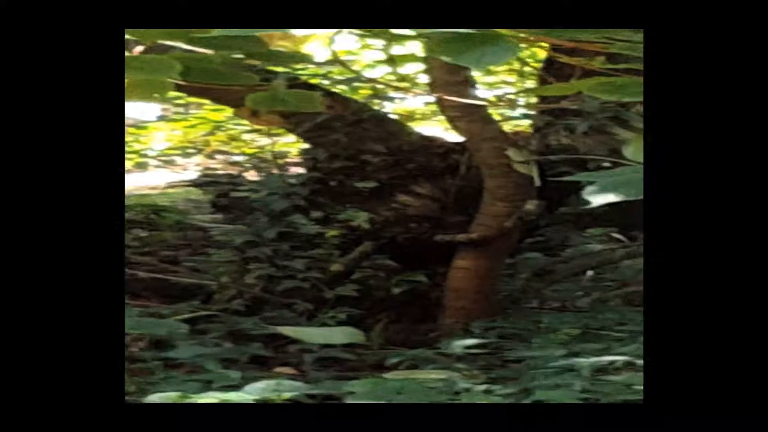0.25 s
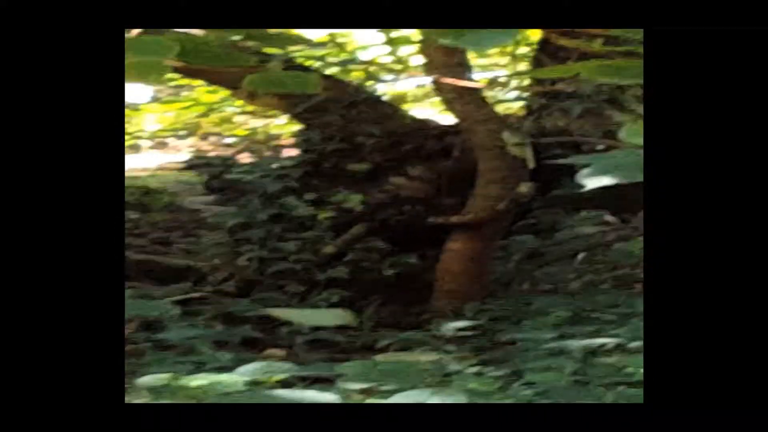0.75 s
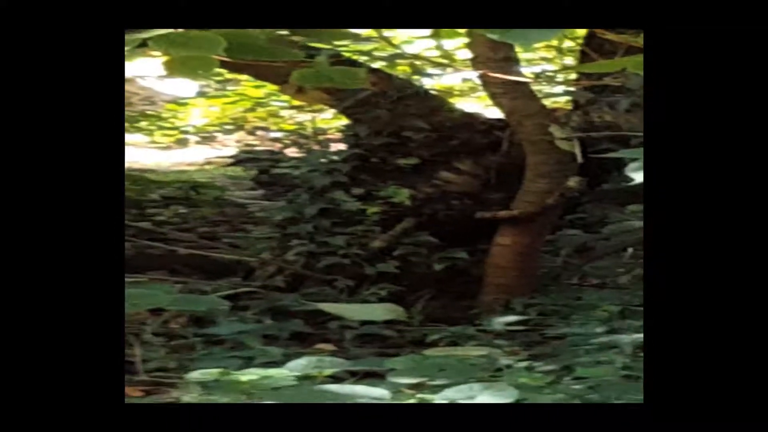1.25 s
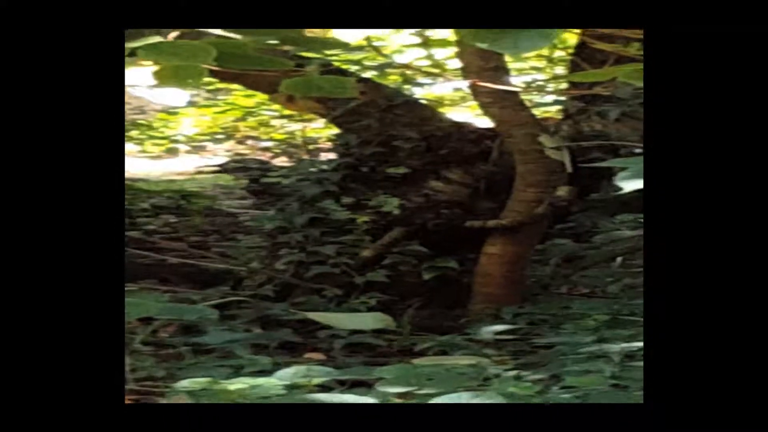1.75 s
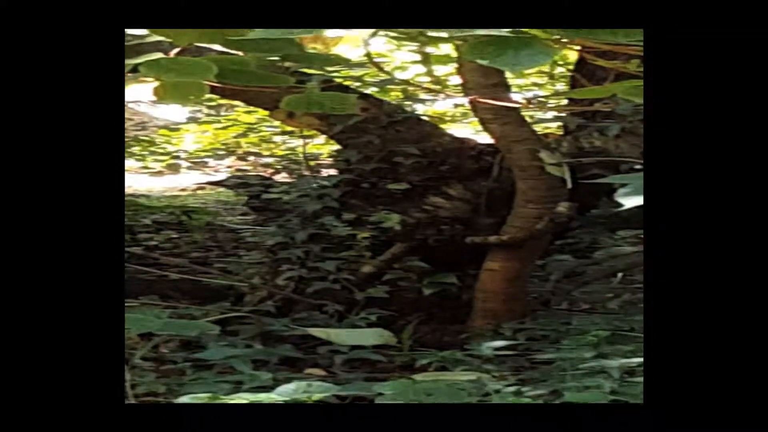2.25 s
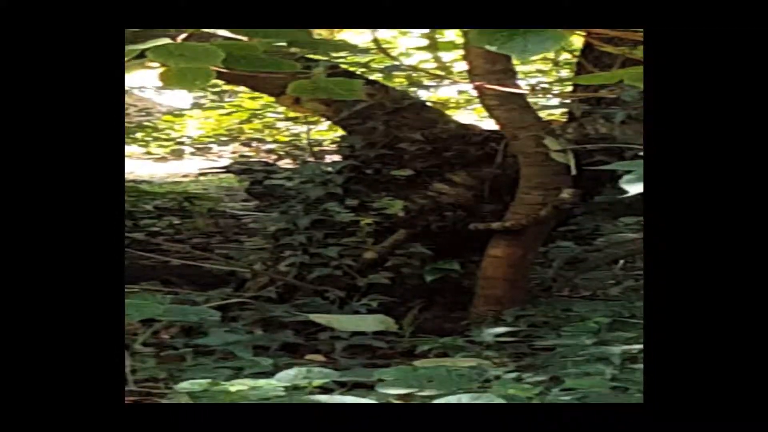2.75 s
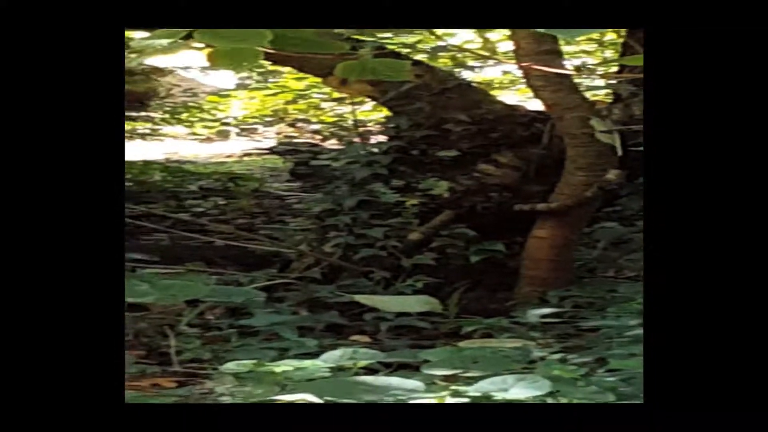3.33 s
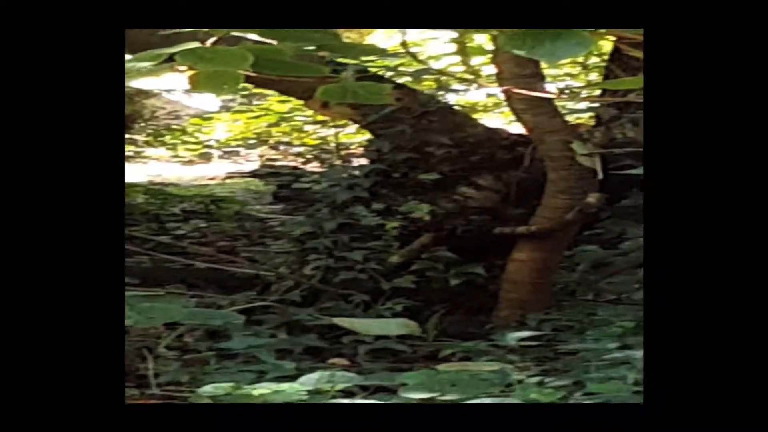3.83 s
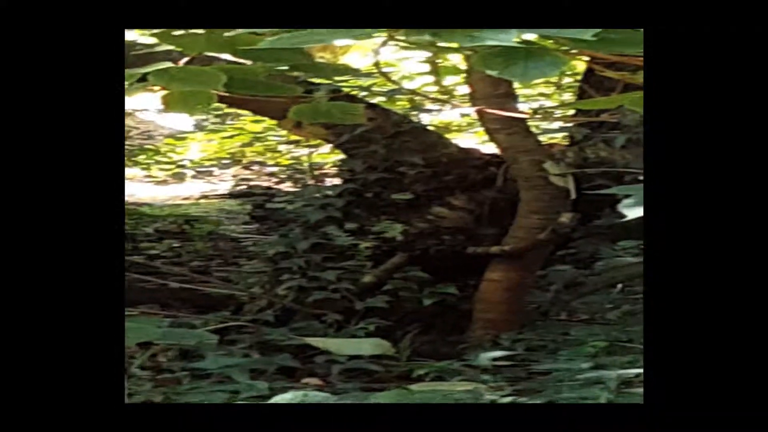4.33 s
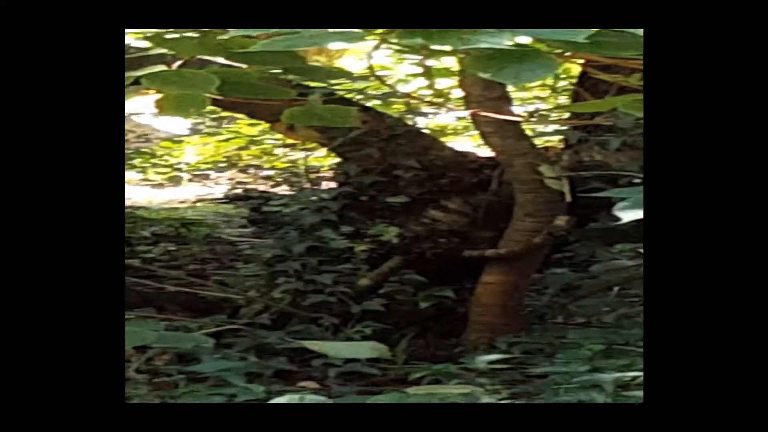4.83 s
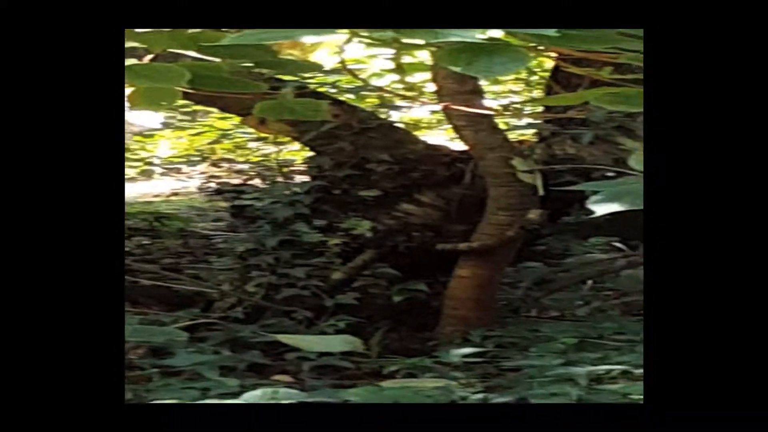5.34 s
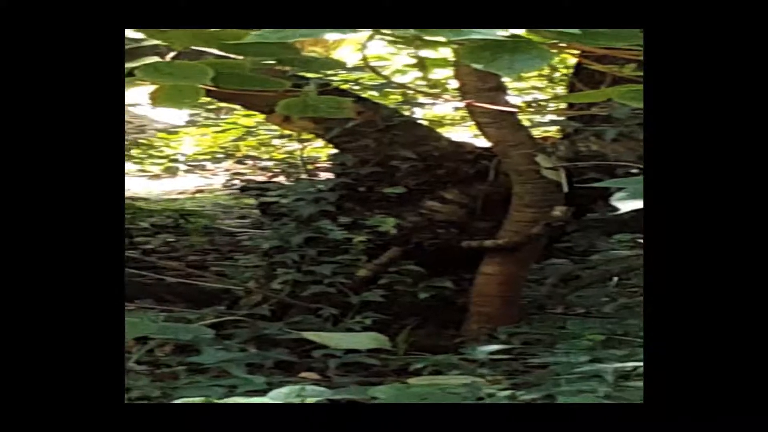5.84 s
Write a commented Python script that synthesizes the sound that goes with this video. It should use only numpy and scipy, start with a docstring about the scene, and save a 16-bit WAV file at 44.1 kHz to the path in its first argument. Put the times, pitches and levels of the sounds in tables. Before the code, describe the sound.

In a leafy forest, a large songbird sings some metres from a small stereo microphone, its notes blurred by echoes from trunks and leaves. Two short whistled slurs come at 0.2 and 0.35 s, then a thin wavering whistle near 2 kHz from 0.45 to 1.45, strengthening at the end. A loud whip shoots upward at 1.5-1.7 with a hoarse edge; a high chip at 2.0 leads straight into a stepped falling whip until 2.2. Echo and quiet follow. Faint rasps and chips start around 2.8, with stronger hoarse pairs at 3.25 and 3.4, weak rasps to 4.1, sharp chips at 4.2-4.35, and softer ones at 4.7 and 5.1. From 5.27, four clattering gallops repeat every 0.22 s: clicks, rasp, dipping low scoop and buzzy high voice. Throughout, a faint very high cricket rasps in threes about four times a second above leaf murmur and far traffic, whose rumble is strongest at the start.

```python
"""Leafy forest, a large songbird some metres from the two microphone ports of a camera.
It opens with two slurs and a long wavering whistle, then a rising whip, a chip and a stepped falling whip;
hoarse rasps and quick chips follow, then a galloping phrase sung with both sides of its voice box.
Whistles are unsteady sines, rasps are slaps and breath in resonant cavities, gallops open with clicks.
Throughout, the trees answer the song, a bush cricket rasps in threes, far traffic and leaves murmur."""
import sys
import numpy as np
from scipy import signal
from scipy.fft import rfft, irfft, next_fast_len
from scipy.io import wavfile
from scipy.ndimage import uniform_filter1d, map_coordinates

SR = 44100
rng = np.random.default_rng(int(sys.argv[2]) if len(sys.argv) > 2 else 0)


def wav_record(signal):
    """Record a signal, one row per channel, as 16-bit PCM in the file named by sys.argv[1]."""
    frames = np.transpose(np.atleast_2d(signal))
    bounded = np.clip(frames, -1, 1)
    # unit amplitude maps onto the largest positive 16-bit level
    quanta = np.round(bounded * 32767).astype(np.int16)
    wavfile.write(sys.argv[1], SR, quanta)


N = 267466
TOP_HZ = 15800  # upper limit of the microphone's band


def amp(db):
    """Gain of a level in dB."""
    return 10 ** (np.asarray(db) / 20)


def unit(x):
    """x at rms 1."""
    return x / np.sqrt(np.mean(x ** 2) + 1e-20)


def along(points, hz):
    """Reads (f/Hz, value) points on a log frequency axis."""
    f, value = np.transpose(points)
    return np.interp(np.log(hz + 1), np.log(f + 1), value)


def span(rows, start=0):
    """Sample numbers covered by the rows, a soft edge, and each column read at those samples."""
    t, *columns = np.transpose(sorted(rows))
    first, last = start + t[0], start + t[-1]
    at = np.arange(round(first * SR), min(N, round(last * SR)))
    edge = np.clip(np.minimum(at / SR - first, last - at / SR) / 0.0014, 0, 1)
    return at, edge, [np.interp(at / SR - start, t, c) for c in columns]


def wobble(rate, size=N):
    """A smooth random curve, rate knots a second."""
    knots = rng.standard_normal(int(size * rate / SR) + 4)
    return map_coordinates(knots, [np.arange(size) * rate / SR])


def filtered(x, response):
    """x times a complex response of frequency."""
    m = next_fast_len(N + SR // 2)
    return irfft(rfft(x, m) * response(np.fft.rfftfreq(m, 1 / SR)), m)[..., :N]


def resonance(f, centre, width):
    """Response of one damped cavity, 1 at its centre."""
    return 1j * f * width / (centre * centre - f * f + 1j * f * width)


def resonant(x, modes):
    """x passed twice through side-by-side resonances of alternating sign, at rms 1."""
    def tube(f):
        return sum((-1) ** k * amp(db) * resonance(f, c, w) for k, (c, w, db) in enumerate(modes))
    return unit(filtered(x, lambda f: tube(f) ** 2))


# overtones of the voice, before each note's strength: multiple of the pitch, level/dB re fundamental
OVERTONE_LEVELS = [(2, -20.5), (3, -31), (4, -41), (5, -29), (6, -28.5)]
THROAT_HZ, THROAT_WIDTH_HZ, THROAT_DB = 1416, 83, 7.5  # clear notes swell as they cross this resonance
BRIGHTENS, WHIP_BRIGHTENS = 0.26, 0.43  # dB of overtones per dB of loudness within a note


def sing_note(out, rows, brassy_db, rough, flutter, start=0, gain_db=0, spread=0, brightens=BRIGHTENS):
    """Sings a clear note: a membrane swings almost as a sine, unsteady in size and timing, overtones weak."""
    at, edge, (hz, db) = span(rows, start)
    brassy_db = brassy_db + brightens * (db - db.max())

    def throat(f):
        return amp(THROAT_DB / (1 + ((f - THROAT_HZ) / THROAT_WIDTH_HZ) ** 2))

    # the size of shake wavers the loudness, its angle the timing
    shake = 1 + rough * (wobble(flutter, len(at)) + 1j * wobble(flutter, len(at)))
    shake = shake / np.sqrt(1 + 2 * rough ** 2)
    detuned_hz = hz * (1 + spread * rng.standard_normal())
    phase = 2 * np.pi * np.cumsum(detuned_hz) / SR + np.angle(shake)
    tone = throat(hz) * np.sin(phase)
    for k, level in OVERTONE_LEVELS:
        in_band = k * hz < TOP_HZ
        tone = tone + amp(level + brassy_db) * throat(k * hz) * np.sin(k * phase) * in_band
    out[at] += np.sqrt(2) * edge * amp(db + gain_db) * np.abs(shake) * tone


# the rising whip, before throat swell: t/s, f/Hz, level/dB
RISING_WHIP = [(1.52, 800, -55.5), (1.54, 692.7, -42.5), (1.59, 783, -44), (1.611, 922.4, -31),
               (1.649, 1419, -29), (1.665, 1973, -31), (1.697, 6100, -22.5)]


def rising_whip():
    """Rows of a whistle whose period changes evenly between points, so a climb in pitch speeds up."""
    t_points, hz, db = np.transpose(RISING_WHIP)
    t = np.linspace(t_points[0], t_points[-1], num=80)
    period = np.interp(t, t_points, 1 / hz)
    return list(zip(t, 1 / period, np.interp(t, t_points, db)))


ONSET_DB, FADE_DB = -18, -9.5  # start and end of a short note, under its turn
SCOOP_FROM_S, SCOOP_LOW_S, SCOOP_LOW_HZ = .024, .098, 786  # s after the scoop's time origin
FLICK_S, FLICK_BACK_S, FLICK_BACK_HZ = .143, .16, 1210
DIP_BEND, CLIMB_BEND = 170, 440  # log pitch over the low point per s squared, before and after it
FLICK_DB = -5  # the flick is softer than the dip


def scoop(top_hz):
    """Rows of the low voice of a gallop: a slow dip, a quicker climb, a flick back down."""
    t = np.linspace(SCOOP_FROM_S, FLICK_S, num=40)
    dipping = t < SCOOP_LOW_S
    bend = np.where(dipping, DIP_BEND, CLIMB_BEND)
    hz = SCOOP_LOW_HZ * np.exp(bend * (t - SCOOP_LOW_S) ** 2)
    db = ONSET_DB * np.clip(1 - (t - SCOOP_FROM_S) / 0.018, 0, 1)
    db = db + FLICK_DB * (t > SCOOP_LOW_S) * (hz > THROAT_HZ)
    capped_hz = np.where(dipping, hz, np.minimum(hz, top_hz))
    return [*zip(t, capped_hz, db), (FLICK_BACK_S, FLICK_BACK_HZ, FLICK_DB)]


# smooth opening notes: t/s, turn after t/s, length/s, start f/Hz, turn f/Hz, end f/Hz,
# level at the turn/dB, overtone strength/dB
OPENING_SLURS = [(.188, 0.0163, .036, 2150, 1727, 1760, -44.5, -7),
                 (.342, .026, 0.05, 2114, 1830, 2230, -40.5, -3)]
# short fluttering notes, same columns
CHIP_NOTES = [(1.998, 0.017, 0.029, 7820, 7680, 6830, -47.5, -8.5),
              (3.03, .022, .036, 3350, 3050, 4350, -59, -18),
              (3.068, .012, .026, 4400, 4550, 4500, -68, -18),
              (4.126, .006, .02, 1200, 1460, 1900, -59, -10),
              (3.245, 0.0254, 0.033, 860, 1350, 1440, -49, 2),
              (3.36, 0.0123, 0.022, 1373, 1384, 1920, -49, -10),
              (3.382, 0.0062, 0.04, 968, 921, 910, -50.5, -7.5),
              (4.225, .005, .014, 1034, 2080, 5270, -36.5, 3.5),
              (4.241, 0.00287, .029, 2800, 2105, 1278, -45, 5),
              (4.331, 0.0045, 0.0098, 1080, 1950, 2590, -32.5, 4.5),
              (4.339, 0.0044, 0.017, 2377, 2585, 2537, -33, -5),
              (4.708, 0.00398, .012, 1290, 1980, 4410, -42.5, -14),
              (4.722, 0.0079, .022, 2310, 1397, 874, -49.5, -15),
              (5.116, 0.0075, 0.0152, 5950, 5940, 7200, -46.5, -3)]
# the long wavering whistle, before throat swell: t/s, f/Hz, level/dB
LONG_WHISTLE = [(.44, 2086, -67), (.53, 2067, -50), (.575, 2061, -61), (0.604, 1880, -50),
                (0.638, 1974, -55), (.8, 2020, -54), (.922, 1996, -59), (.938, 1969, -46),
                (1.02, 2011, -55.5), (1.14, 1979, -51), (1.198, 1990, -62.5), (1.213, 1944, -50),
                (1.265, 2061, -47), (1.323, 2050, -50.5), (1.341, 2046, -36.5), (1.391, 1957, -32.5),
                (1.402, 2092, -40), (1.428, 1983, -41), (1.445, 2010, -56)]
# the stepped falling whip, before throat swell: t/s, f/Hz, level/dB
FALLING_WHIP = [(2.022, 5280, -59.5), (2.025, 5980, -31.5), (2.038, 6030, -28.5), (2.052, 5600, -28.5),
                (2.06, 4590, -28.5), (2.093, 4577, -23.5), (2.11, 3220, -29), (2.14, 2686, -35),
                (2.151, 2606, -26.5), (2.17, 1424, -40.5), (2.19, 735, -59)]
# gallops: t/s, then gains on each part's own levels: click level/dB, scoop level/dB, upper voice level/dB,
# rasp level/dB; top of the flick f/Hz, lateness of the scoop t/s
GALLOPS = [(5.272, -34, -52, -3, -5.5, 2090, .002), (5.491, -28, -51, 2.5, -1.3, 2160, -.001),
           (5.712, -30.5, -49, 0.5, -1.1, 1410, -.002), (5.933, -32, -49, 1, 1.5, 2100, -0.0049)]
# high voice of a gallop: t/s after its start, f/Hz, level/dB before the gallop's gain
UPPER_VOICE = [(.035, 3052, -64.5), (0.054, 3168, -57.5), (.1, 3280, -59), (.124, 3390, -56),
               (.139, 2315, -59)]
# a flatter, plain tone just under the high voice, same columns
UNDER_VOICE = [(.03, 2896, -64), (.06, 2960, -53), (.105, 3000, -66)]
CHIP_ONSET_DB = -18.5  # start of a chip, under its turn
SECOND_HZ, SECOND_DB = 2087, -11  # the other side of the voice box holds one pitch under the long whistle


def whistles():
    """The clear notes, and both voices of each gallop, from the two sides of the voice box."""
    out = np.zeros(N)
    # unsteadiness as a share of the swing, then its speed in knots per s
    for notes, onset_db, rough, flutter in [(OPENING_SLURS, ONSET_DB, .25, 90),
                                            (CHIP_NOTES, CHIP_ONSET_DB, .75, 450)]:
        for t, turn, length, start_hz, turn_hz, end_hz, db, brassy_db in notes:
            rows = [(0, start_hz, onset_db), (turn, turn_hz, 0), (length, end_hz, FADE_DB)]
            sing_note(out, rows, brassy_db, rough, flutter, start=t, gain_db=db)
    # overtone strengths
    held_db, rise_db, fall_db, scoop_brass_db, upper_brass_db = -2, -6, 3.0, -8, 18.5
    sing_note(out, LONG_WHISTLE, held_db, .7, 125)
    second_side = [(t, SECOND_HZ, db) for t, _, db in LONG_WHISTLE]
    sing_note(out, second_side, held_db - 9, .6, 110, gain_db=SECOND_DB)
    sing_note(out, rising_whip(), rise_db, .3, 400, brightens=WHIP_BRIGHTENS)
    sing_note(out, FALLING_WHIP, fall_db, .33, 280)
    for t, _, scoop_db, upper_db, _, top_hz, late in GALLOPS:
        sing_note(out, scoop(top_hz), scoop_brass_db, .2, 150, start=t + late, gain_db=scoop_db, spread=.015)
        sing_note(out, UNDER_VOICE, scoop_brass_db, .8, 250, start=t, gain_db=upper_db, spread=.01)
        sing_note(out, UPPER_VOICE, upper_brass_db, 1.1, 350, start=t, gain_db=upper_db, spread=.015)
    return out


# hoarse notes: peak t/s, rise t/s, fall t/s, mouth level/dB, then chest, tongue and beak level/dB re mouth
HOARSE_NOTES = [(1.688, 0.049, 0.028, -38.5, -23, -5, -2.5), (2.915, 0.18, 0.09, -64.5, 0, 7, 2),
                (3.268, 0.052, 0.035, -46, -2.5, -3.5, -4.5), (3.393, 0.052, 0.035, -48.5, 0.5, -1.5, -4.5),
                (3.658, .018, .012, -73.5, -9, -2.5, 2), (3.881, 0.16, 0.14, -65.5, 1.3, -4, -5.5),
                (4.055, 0.065, 0.024, -63.5, -6, -6, -5), (4.165, 0.044, 0.049, -49.5, 3.5, -3, -5.5),
                (4.233, 0.018, 0.03, -43, 3.5, -6, -24.5), (4.339, 0.02, 0.036, -47.5, 4, -5.5, -16),
                (4.666, 0.095, .11, -54.5, 7.5, -14, -8), (4.886, 0.054, 0.06, -60.5, -6, -0.5, -8.5),
                (5.245, 0.053, 0.027, -61.5, 0, -5, -6)]
# rasp of one gallop: t/s after its start, level/dB before the gallop's gain
GALLOP_RASP = [(.003, -46), (.008, -44.5), (.03, -48), (0.101, -73), (.14, -51.5), (.215, -52.5)]
# balance of that rasp: chest, tongue, beak level/dB re mouth
GALLOP_RASP_SHAPE = (-2.5, -6, -3.5)
# low throat resonances: f/Hz, width/Hz, level/dB, all for one of the two passes
CHEST_MODES = [(954, 300, 0.5), (1395, 170, 5), (2084, 620, 3)]
# mouth resonances, same columns
MOUTH_MODES = [(2570, 540, 3.5), (4054, 1040, 6)]
# tongue resonances, same columns
TONGUE_MODES = [(4740, 1200, 1.5), (5680, 1150, 1.5)]
# beak resonances, same columns
BEAK_MODES = [(6350, 2500, 1), (8930, 740, 4), (10200, 1960, 0), (13500, 2100, -18)]
# air through the beak, same columns
HISS_MODES = [(13300, 3000, 0)]
RASP_START_DB, RASP_END_DB = -26, -13.5  # under the peak
HISS_DB, HISS_GROWS = -16.5, .6  # re mouth for a peak of -48.5 dB; dB more per dB of strength


def rasps():
    """Membranes slap shut unevenly; each slap rings chest, mouth, tongue and beak, and hisses more when loud."""
    slaps_per_s = 700 * (1 + .06 * wobble(30) + .3 * wobble(500))
    beats = np.cumsum(slaps_per_s) / SR
    slaps = np.diff(np.floor(beats), prepend=0) * amp(3 * wobble(400))
    breath = 1.1 * amp(3 * wobble(250)) * rng.standard_normal(N)
    source = unit(slaps) + breath
    notes = []
    for t, rise, fall, db, *shape in HOARSE_NOTES:
        notes.append((t, db, [(-rise, RASP_START_DB), (0, 0), (fall, RASP_END_DB)], shape))
    for gallop in GALLOPS:
        notes.append((gallop[0], gallop[4], GALLOP_RASP, GALLOP_RASP_SHAPE))
    gains = np.zeros((5, N))
    for start, gain_db, rows, shape in notes:
        at, edge, (db,) = span(rows, start)
        hiss_db = HISS_DB + HISS_GROWS * (gain_db + db.max() + 48.5)
        balance_db = np.array([0, *shape, hiss_db])[:, None]
        gains[:, at] += edge * amp(gain_db + db + balance_db)
    out = np.zeros(N)
    for gain, modes in zip(gains, (MOUTH_MODES, CHEST_MODES, TONGUE_MODES, BEAK_MODES, HISS_MODES)):
        # each cavity sputters on its own as the throat shifts
        out += gain * amp(2.2 * wobble(140)) * resonant(source, modes)
    return out


def clicks():
    """Three quick snaps of the voice box open each gallop, with a puff of air."""
    snaps, t = np.zeros(N), np.arange(SR // 50) / SR
    for start, db, *_ in GALLOPS:
        puff = amp(db + 1.5 - 60 * t / 0.022) * rng.standard_normal(len(t))
        snaps[round((start + .002) * SR):][:len(t)] = puff
        for late, snap_db in [(.002, 4.5), (.0043, 6.5), (.0066, -0.5)]:
            snaps[round((start + late) * SR)] += amp(db + snap_db + 18.5)
    # f/Hz, width/Hz, level/dB
    throat = [(1900, 500, 3), (4000, 700, -7), (5500, 700, -7), (11000, 6000, -30)]

    def voice_box(f):
        blunt = 1 / (1 + 1j * f / 2500)  # soft tissue rounds each snap
        return blunt * sum(amp(db) * resonance(f, c, w) for c, w, db in throat)
    return filtered(snaps, voice_box)


# decay of the far trunks' echo: f/Hz, t60/s
TRUNK_DECAY = [(700, 0.85), (2100, 0.93), (5500, 0.6), (8000, 0.74), (14000, 0.22)]


def trees(x):
    """Near leaves scatter the song briefly, far trunks for long; each stretch of it meets a new tail."""
    out, step = np.zeros((2, N + 2 * SR)), SR // 3
    for start in range(0, N, step):
        hz, t, z = signal.stft(rng.standard_normal((2, SR)), SR, nperseg=256)
        trunks = amp(-60 * t / along(TRUNK_DECAY, hz)[:, None])
        leaves = 3.5 * amp(-60 * t / .16)
        tail = signal.istft(z * (trunks + leaves), SR, nperseg=256)[1]
        tail = tail * np.clip(np.arange(tail.shape[1]) / SR / 0.0025, 0, 1)
        wet = signal.fftconvolve(x[None, start:start + step], tail / np.linalg.norm(tail[0]), axes=1)
        out[:, start:start + wet.shape[1]] += wet
    left, right = out
    return np.array([left + 0.065 * right, right + 0.17 * left])[:, :N]


# starts of the cricket's chirps: t/s
CHIRP_STARTS = [.145, .409, .66, .922, 1.169, 1.419, 1.668, 1.933, 2.18, 2.444, 2.682, 2.955, 3.221, 3.521,
                3.755, 3.998, 4.27, 4.525, 4.79, 5.065, 5.31, 5.567, 5.826]
# wing strokes of a chirp: t/s after its start, length/s, level/dB before the chirp's own level
WING_STROKES = [(-.008, .022, -5), (0.026, .026, -2.5), (0.062, 0.04, -4)]
# wing resonances: f/Hz, width/Hz, level/dB, all for one of the two passes
WING_MODES = [(12700, 670, -10.5), (13680, 620, -7), (15400, 650, -11)]


def cricket():
    """Each wing stroke drags a scraper over a row of teeth, swelling and fading."""
    strokes = np.zeros(N)
    for start in CHIRP_STARTS:
        chirp_db = -62.5 - .4 * start  # slowly fainter
        for late, length, stroke_db in WING_STROKES:
            shape = np.hanning(round(length * SR)) ** .6
            strokes[round((start + late) * SR):][:len(shape)] += amp(stroke_db + chirp_db) * shape
    teeth = rng.standard_normal((2, N)) * amp(2.5 * wobble(600))
    blurred = uniform_filter1d(np.roll(strokes, 600), 2500) * .3  # a soft, slightly late haze
    return (strokes + blurred) * resonant(teeth, WING_MODES) * amp([[-1.2], [1.2]])  # nearer the right


# likeness of the background at the two ports: f/Hz, left-right correlation
PORT_LIKENESS = [(60, 1), (240, 0.89), (950, 0.72), (3770, 0.027), (15000, 0.091)]


def rush(spectrum, patchy_db):
    """Stereo noise of rms 1 with patches of random gain, its ports less alike where the table says so."""
    z = signal.stft(rng.standard_normal((2, N)), nperseg=512)[2]
    field = uniform_filter1d(rng.standard_normal(z.shape[1:]), 6, 0)
    field = uniform_filter1d(field, 14, 1)
    pair = signal.istft(z * amp(patchy_db * unit(field)), nperseg=512)[1][:, :N]

    def mid_side(hz):
        turn = np.arccos(np.clip(along(PORT_LIKENESS, hz), -1, 1)) / 2
        return amp(along(spectrum, hz)) * [np.cos(turn), np.sin(turn)]
    mid, side = filtered(pair, mid_side)
    return unit(np.array([mid + side, mid - side]))


# loudness of the background, before its small wavering: t/s, rumble level/dB, murmur level/dB
AIR_LEVELS = [(0.0, -47.5, -57), (0.79, -59, -60), (2.04, -52.5, -57), (2.51, -59.5, -62),
              (4.79, -59, -62.5), (6.06, -60.5, -62)]
# colour of the far traffic: f/Hz, relative level per Hz/dB
RUMBLE_SPECTRUM = [(20, -27.5), (40, -14), (65, 0.5), (85, -2.5), (125, -1.5), (180, -12), (300, -21.5),
                   (600, -67.5)]
# colour of leaves and distant insects: f/Hz, relative level per Hz/dB
MURMUR_SPECTRUM = [(120, -48), (200, 3.5), (240, -6), (305, -3.5), (836, 2), (1650, -7), (1810, -8),
                   (4120, -19), (4680, -20), (8270, -28), (14100, -21), (16000, -19.5)]


def air():
    """Far traffic rumbles under the murmur of leaves and distant insects, both as shaped noise."""
    at, _, levels = span(AIR_LEVELS)
    rumble_db, murmur_db = (np.interp(np.arange(N), at, c) for c in levels)
    rumble = amp(rumble_db + wobble(6)) * rush(RUMBLE_SPECTRUM, patchy_db=.8)
    murmur = amp(murmur_db + .9 * wobble(4)) * rush(MURMUR_SPECTRUM, patchy_db=1.6)
    return rumble + murmur


# shading of the bird by the camera body: f/Hz, left minus right level/dB
BODY_SHADE = [(700, -3.5), (1290, 9), (2380, 3), (4400, -9.5), (8120, 2.5), (15000, -9)]
# lead of the left port over the right: f/Hz, phase/rad
PORT_LEAD = [(500, 0.18), (1400, 0.34), (2500, 1.45), (4500, 1.32), (9000, 1.16)]


def scene():
    """The bird reaches the two ports shaded and out of step, with its echoes, over cricket and air."""
    bird = whistles() + rasps() + clicks()
    sides = np.array([[.5], [-.5]])  # half of each difference to either port

    def ports(hz):
        return amp(sides * along(BODY_SHADE, hz)) * np.exp(1j * sides * along(PORT_LEAD, hz))
    direct = filtered(bird, ports)
    return direct + amp(-3.5) * trees(bird) + cricket() + air()


def record(dry):
    """The camera keeps nothing above its band limit."""
    return filtered(dry, lambda hz: hz < TOP_HZ)


dry = scene()
out = record(dry)
wav_record(out)
```